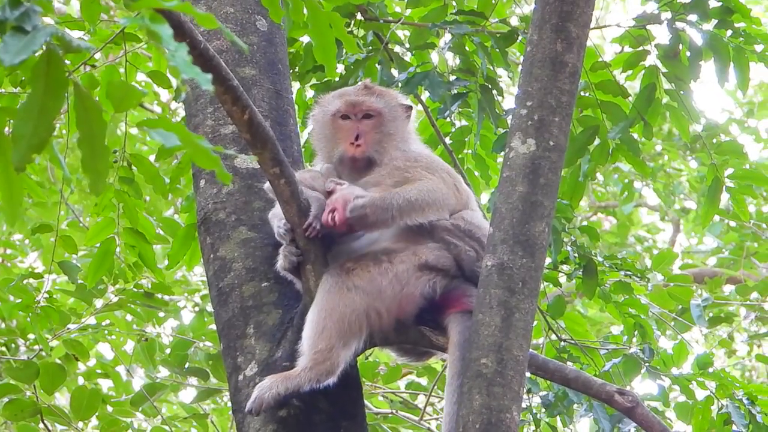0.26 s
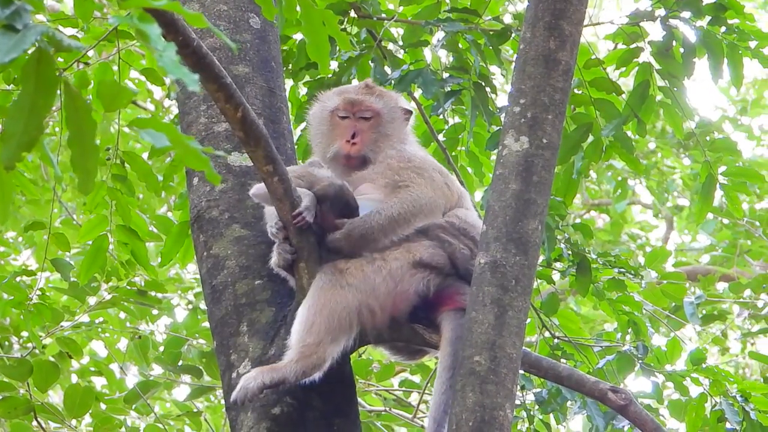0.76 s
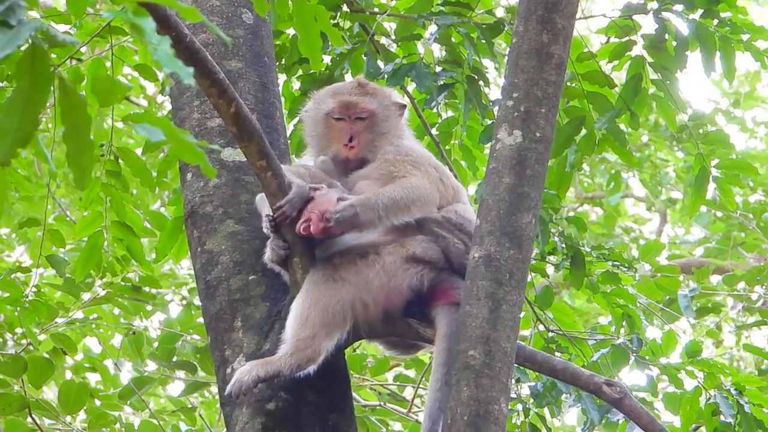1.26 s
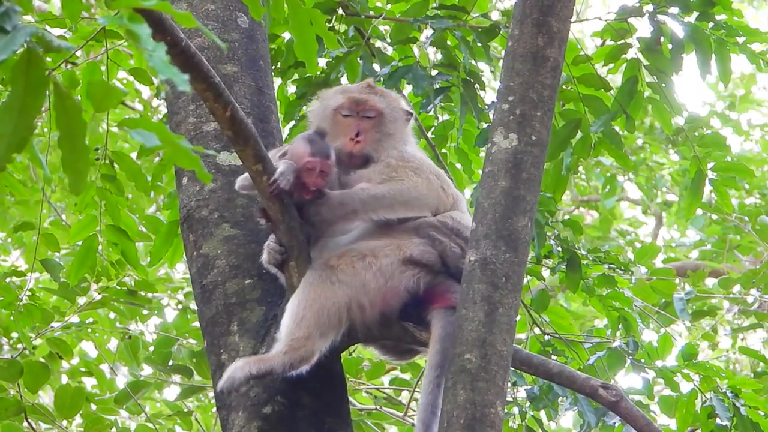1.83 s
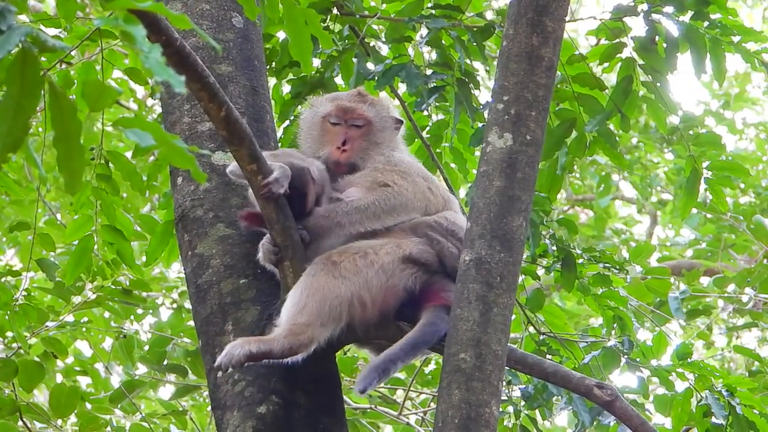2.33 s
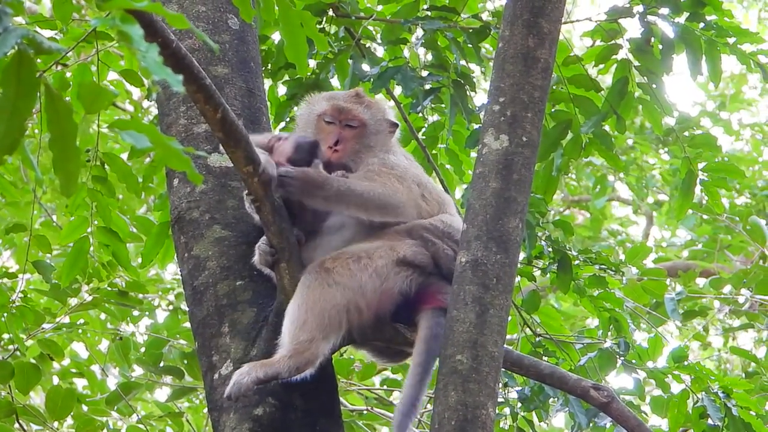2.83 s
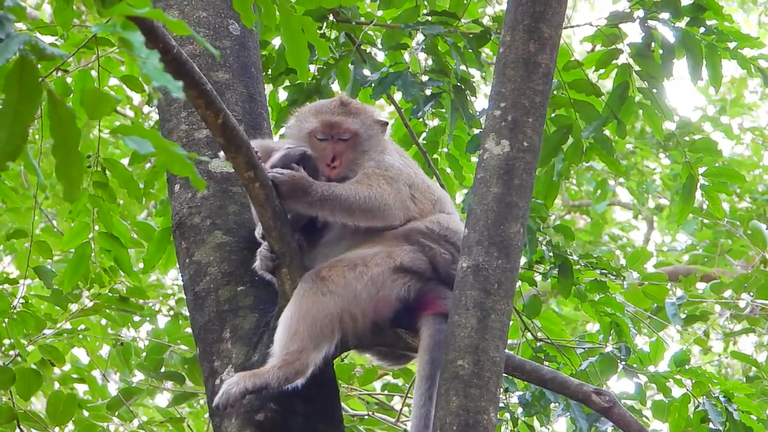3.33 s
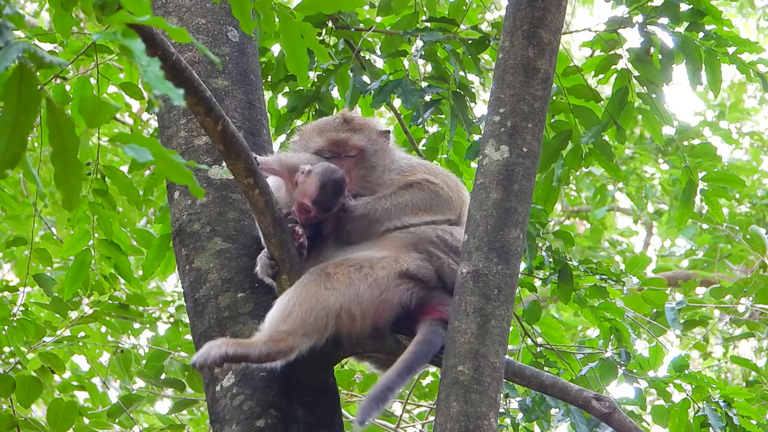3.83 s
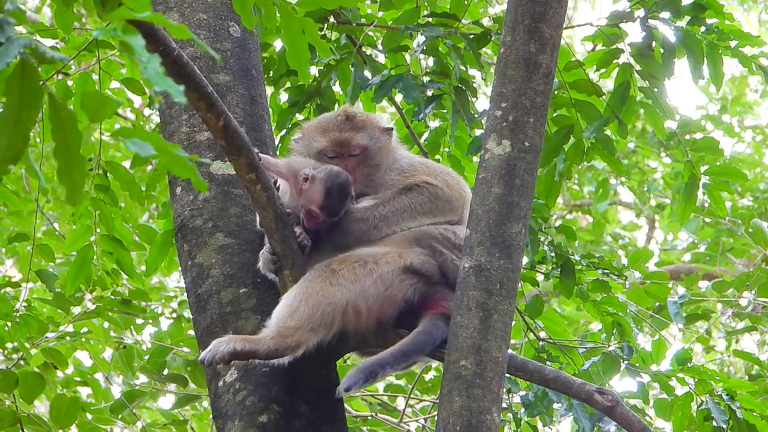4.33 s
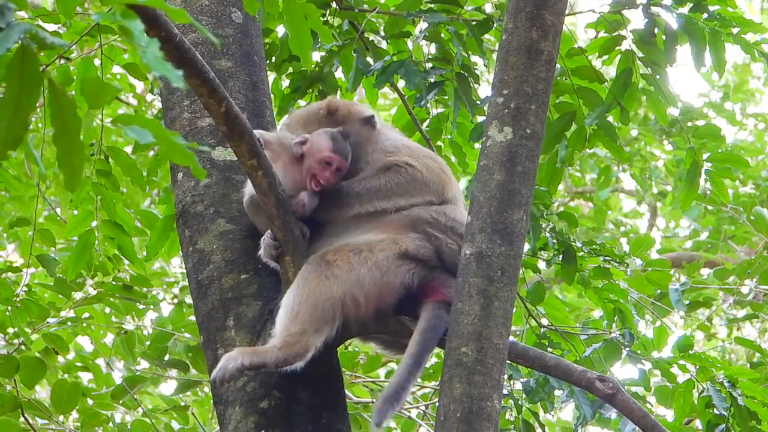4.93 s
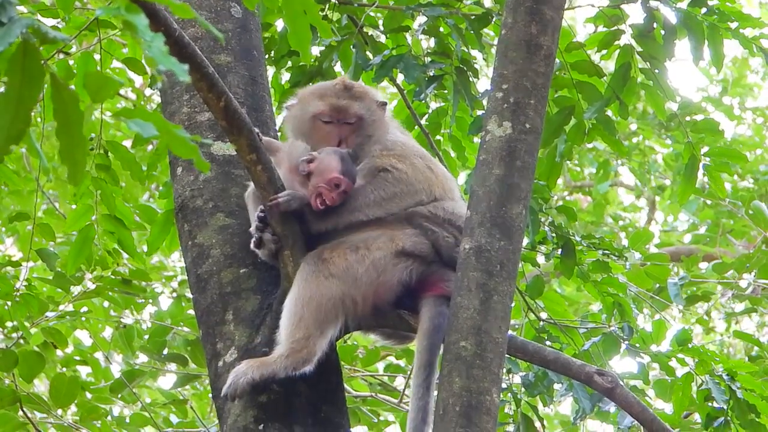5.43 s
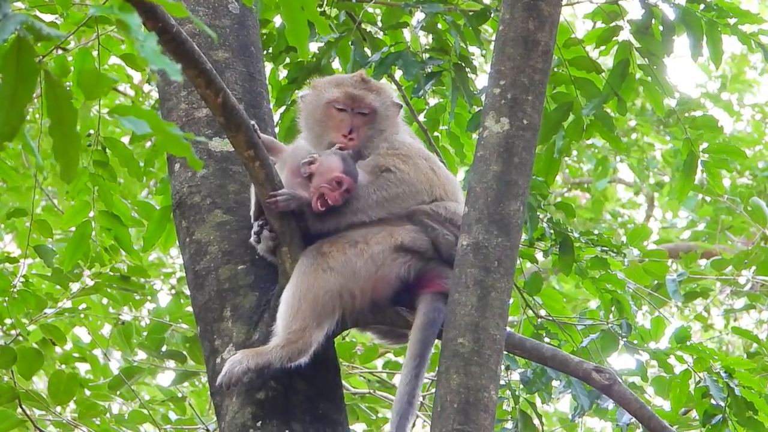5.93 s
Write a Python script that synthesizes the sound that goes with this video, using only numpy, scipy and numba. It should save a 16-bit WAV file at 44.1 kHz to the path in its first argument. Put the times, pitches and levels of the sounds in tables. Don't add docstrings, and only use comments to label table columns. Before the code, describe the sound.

Outdoors in a forest, a quiet bed of wind, leaves and faint insects runs throughout. At 0 seconds a raspy infant monkey scream is already dying away, its echo hanging in the trees. Nine more shrill cries follow, starting near 0.45, 1.1, 1.7, 2.35, 2.9, 3.7, 4.45, 5.0 and 5.6 seconds, each about a quarter to two fifths of a second long. Most open with a thin whistle sweeping upward, then break into a harsh, buzzing, high rasp that darkens or sinks as the mouth closes. The first of these has two bursts; those near 2.9 and 3.7 open with especially clear, loud peeps. A faint low hoot sounds far off around 1.1 seconds, and a dry twig knock clicks near 3.6. Leaves and trunks scatter each cry into a diffuse tail. The last cry fades at 6 seconds. The source is some metres from a small stereo microphone.

```python
import sys
import numpy as np
from scipy import signal
from scipy.fft import rfft, irfft
from scipy.io import wavfile
from scipy.ndimage import uniform_filter1d
from numba import njit

SR = 44100
rng = np.random.default_rng(int(sys.argv[2]) if len(sys.argv) > 2 else 0)


def wav_record(signal):
    frames = np.transpose(np.atleast_2d(signal))
    bounded = np.clip(frames, -1, 1)
    quanta = np.round(bounded * 32767).astype(np.int16)
    wavfile.write(sys.argv[1], SR, quanta)


def to_linear_factor(level_db):
    exponent = np.asarray(level_db, float) / 20
    return 10 ** exponent


N = 272538
LEAD = 13230
M = N + LEAD
T = (np.arange(M) - LEAD) / SR


def unit(x):
    return x / np.sqrt(np.mean(x ** 2))


@njit
def svf(x, hz, width):
    y, band, low = np.empty(len(x)), 0., 0.
    for i in range(len(x)):
        g, k = np.tan(np.pi * hz[i] / SR), width / hz[i]
        v = (band + g * (x[i] - low)) / (1 + g * (g + k))
        band, low, y[i] = 2 * v - band, low + 2 * g * v, k * v
    return y


def resonance(x, hz, width_hz):
    hz = hz + np.zeros(len(x))
    once = svf(x, hz, 1. * width_hz)
    return unit(svf(once, hz, 1. * width_hz))


def above(x, hz):
    return signal.sosfilt(signal.butter(10, hz, "high", fs=SR, output="sos"), x)


def walk(rate):
    k = int(SR / rate)
    held = np.repeat(rng.standard_normal(M // k + 1), k)
    slewed = uniform_filter1d(uniform_filter1d(held, k), k)
    return unit(slewed[:M])


def decay(t, t60):
    return np.exp(-np.log(1000) * t / t60)


def moments(start, end):
    return np.linspace(start, end, num=80)


def played(tables, fade_s):
    s, *columns = np.transpose([row for table in tables for row in table])
    gate = 0
    for table in tables:
        start, end = table[0][0], table[-1][0]
        if start < .01:
            start = -1
        gate = gate + np.interp(T, [start - fade_s, start, end, end + fade_s], [0, 1, 1, 0])
    return gate, [np.interp(T, s, column) for column in columns]


# frequency [Hz], level [dB per Hz].
MURMUR_SPECTRUM = [(35, -40), (60, -55), (107, -19.5), (171, -9.5), (485, -14), (850, -14.5), (1480, -19.5),
                   (2700, -19), (4300, -23.5), (7000, -16), (11000, -50.5), (15500, -56)]
# time [s], level [dB].
MURMUR_SWELL = [(0, -65), (.6, -62), (1.4, -62), (2.4, -60.5), (2.75, -62), (3.4, -60.5), (3.85, -59),
                (4.15, -62), (4.7, -61.5), (5.7, -61.5), (6.18, -65)]


def murmur(flicker_db=3.2, side_db=-13, alike_hz=1500):
    out = 0
    shape_hz, shape_db = np.transpose(MURMUR_SPECTRUM)
    swell_db = np.interp(T, *np.transpose(MURMUR_SWELL))
    for hz in 30 * 2 ** np.arange(0, 9, 1 / 3):
        mid, side = (resonance(rng.standard_normal(M), hz, hz / 3) for _ in range(2))
        band_db = np.interp(np.log(hz), np.log(shape_hz), shape_db) + 10 * np.log10(hz)
        apart = min(to_linear_factor(side_db) + hz / alike_hz * 0.2, 1)
        pair = mid + apart * side * np.array([[1], [-1]])
        out = out + to_linear_factor(band_db + flicker_db * walk(9)) * pair
    return unit(out) * to_linear_factor(swell_db + 4.5)


def swing(hz, spread):
    stagger = .5 * walk(1500) + .9 * np.tanh(2 * walk(70))
    return np.sqrt(2) * np.sin(2 * np.pi * np.cumsum(hz * (1 + spread * stagger)) / SR)


# time [s], level [dB].
EFFORT = [
    [(0.0, -32.5), (.054, -36.5), (.072, -53), (.09, -68)],
    [(.458, -42), (.486, -34.5), (.5, -51.5), (.578, -36), (.69, -35), (.752, -42), (.79, -73)],
    [(1.145, -32.5), (1.195, -34.5), (1.25, -33.5), (1.327, -32.5), (1.375, -56)],
    [(1.757, -32), (1.775, -43.5), (1.891, -29.5), (1.977, -34.5), (2.003, -31.5), (2.029, -48),
     (2.08, -64)],
    [(2.36, -50), (2.404, -36.5), (2.462, -36.5), (2.52, -31.5), (2.596, -42.5), (2.61, -64)],
    [(2.94, -47), (2.994, -39.5), (3.07, -37), (3.2, -30), (3.25, -49)],
    [(3.73, -41), (3.77, -42), (3.851, -31), (3.987, -33), (4.031, -34), (4.073, -36.5), (4.09, -67)],
    [(4.55, -55.5), (4.6, -29.5), (4.666, -31), (4.702, -35.5), (4.808, -39), (4.84, -66)],
    [(5.02, -45.5), (5.05, -43.5), (5.07, -39), (5.245, -31.5), (5.268, -59)],
    [(5.64, -55), (5.676, -36.5), (5.782, -29.5), (5.834, -37), (5.924, -34), (5.948, -32), (6.0, -44)],
]
# mouth resonance [Hz], second resonance [dB],
# treble [dB], throat [dB], left minus right [dB].
MOUTHS = [
    (4450, -3, -18.5, -24, 3),
    (4400, -12.5, -19.5, -20.5, 2),
    (4604, -3, -13.5, -20.5, 1.5),
    (4600, -10, -14.5, -22.5, 2),
    (4494, -10.5, -18.5, -21.5, 15),
    (4450, -8.5, -15.5, -16.5, 2.5),
    (4500, -9.5, -16, -21.5, 3.3),
    (4320, -8.5, -16, -21, 2.5),
    (4650, -10, -11, -25, 1.5),
    (4620, -5.5, -18.5, -22.5, 0.8),
]


def rasp_controls():
    full_db, closing_s = -36.5, .12
    out = []
    for curve, (hz, second_db, treble_db, throat_db, pan_db) in zip(EFFORT, MOUTHS):
        s, db = np.transpose(curve)
        t = moments(s[0], s[-1])
        db = np.interp(t, s, db)
        slack = full_db - db
        shut = np.clip(1 - (s[-1] - t) / closing_s, 0, 1)
        second = second_db + 0.17 * slack - 10.5 * shut
        treble = treble_db + 0.57 * slack - 14 * shut
        throat = throat_db + 0.1 * slack - 2 * shut
        out.append(np.c_[t, db, hz - 330 * shut, second, treble, throat, pan_db + 0 * t])
    return out


def rasp(breath=.6, patchy_db=2.5, wander=.015):
    gate, (db, mouth_hz, second_db, treble_db, throat_db, pan_db) = played(rasp_controls(), .009)
    lip_hz, lip_db, second_hz, edge_hz = 5300, -4, 6500, 3430
    air = rng.standard_normal(M)
    mouth = swing(mouth_hz, 0.078) + breath * resonance(air, mouth_hz, 900)
    lips = swing(lip_hz * (1 + wander * walk(25)), 0.088) + breath * resonance(air, lip_hz, 1200)
    second_hz = second_hz * (1 + wander * walk(17))
    second = 0.27 * swing(second_hz, 0.054) + resonance(air, second_hz, 3000)
    treble = resonance(air, 10060, 5900) + to_linear_factor(-13.5) * resonance(air, 12200, 4600)
    throat = unit(above(resonance(air, 3050, 600), 2700))
    chest = to_linear_factor(-28.5) * resonance(air, 1930, 1830)
    front = unit(to_linear_factor(patchy_db * walk(150)) * mouth - to_linear_factor(lip_db + patchy_db * walk(150)) * lips)
    back = to_linear_factor(second_db + patchy_db * walk(81)) * unit(second) - to_linear_factor(treble_db + walk(47)) * unit(treble)
    upper = above(front + back, edge_hz)
    throat = to_linear_factor(throat_db + patchy_db * walk(60)) * throat
    return gate * to_linear_factor(db) * (upper + chest + throat), pan_db


# frequency [Hz], width [Hz], lift [dB].
HOLLOWS = [(4120, 150, -2), (4680, 200, -7), (5330, 200, -3), (5960, 200, -4), (6800, 250, -4)]


def hollows(cry):
    return cry + sum(to_linear_factor(db) * svf(cry, hz + np.zeros(M), 1. * width) for hz, width, db in HOLLOWS)


def whistle(tables, jitter=0.1427, shimmer_db=9, waver_db=0.5):
    gate, (hz, db, octave_db, rough) = played(tables, .005)
    shaken_hz = hz * (1 + jitter * rough * walk(900) + 0.011 * walk(150))
    phase = 2 * np.pi * np.cumsum(shaken_hz) / SR
    octave = to_linear_factor(octave_db + 4.0 * walk(120)) * np.sin(2 * phase) * np.clip((6500 - hz) / 1000, 0, 1)
    shaken_db = db + (waver_db + shimmer_db * rough) * np.clip(walk(250), -3, 1.5)
    return np.sqrt(2) * gate * to_linear_factor(shaken_db) * (np.sin(phase) + octave)


def glides(rows, octave_db, rough):
    edges = ((0, -0.5), (0.79, 0), (1, -3))
    out = []
    for s, long, from_hz, to_hz, db in rows:
        out.append([(s + share * long, from_hz + share * (to_hz - from_hz), db + edge_db, octave_db, rough)
                    for share, edge_db in edges])
    return out


# start [s], length [s], from pitch [Hz], to pitch [Hz], peak level [dB].
ENDINGS = [(.03, 0.05, 4800, 3400, -43.5), (.63, .075, 4200, 4150, -36.5), (.718, .06, 4266, 3700, -36.5),
           (1.325, .042, 5600, 3250, -37.5), (1.678, 0.046, 1325, 1850, -56.5),
           (2.01, 0.05, 4650, 3750, -34), (2.485, .075, 4210, 4150, -34), (2.572, .03, 4190, 3600, -34),
           (2.883, .014, 3197, 3600, -62), (4.022, 0.033, 5160, 4750, -32),
           (4.062, 0.019, 4600, 3600, -30.5), (5.06, .11, 4790, 4600, -35.5),
           (5.82, .165, 2828, 2650, -54.5)]


def endings():
    return glides(ENDINGS, -42, rough=.22)


# start [s], length [s], from pitch [Hz], to pitch [Hz],
# peak level [dB].
CREAKS = [
    (.438, 0.00904, 3147, 3400, -54),
    (3.688, 0.0084, 4900, 4600, -47),
    (4.43, 0.01827, 3200, 3700, -60),
    (4.735, .075, 3563, 3000, -38),
    (5.185, 0.066, 4400, 3504, -37),
]


def creaks():
    return glides(CREAKS, -23, rough=.45)


# time [s], pitch [Hz].
OPENINGS = [
    [(.455, 3400), (.464, 3750), (.482, 4700), (.497, 6300), (.53, 8100)],
    [(1.093, 5600), (1.105, 4300), (1.116, 3900), (1.13, 3830), (1.143, 4550), (1.165, 4680), (1.24, 4760)],
    [(1.717, 2350), (1.73, 2900), (1.738, 3750), (1.752, 3950), (1.765, 5300), (1.785, 6750), (1.87, 7350)],
    [(2.342, 3030), (2.37, 3790), (2.41, 4720)],
    [(2.883, 3230), (2.905, 4060), (2.918, 4310), (2.933, 4450), (2.95, 5320), (2.97, 5720)],
    [(3.687, 3960), (3.708, 4120), (3.722, 4300), (3.73, 4700), (3.738, 5900), (3.755, 6700), (3.78, 7570),
     (3.81, 8430)],
    [(4.452, 3250), (4.464, 3820), (4.483, 4200), (4.494, 5660), (4.506, 5550), (4.512, 4720),
     (4.528, 7450), (4.55, 7430), (4.6, 8080)],
    [(5.002, 6300), (5.01, 5350), (5.02, 5320), (5.032, 5970), (5.052, 6110), (5.08, 7840), (5.11, 6770)],
    [(5.579, 5370), (5.588, 5410), (5.597, 4400), (5.607, 5180), (5.617, 4800), (5.635, 6320), (5.69, 8850),
     (5.73, 8940)],
]
# time [s], peak [dB], swell [dB/s], octave level [dB].
PEEPS = [
    (0.465, -43.5, 600, -58),
    (1.142, -30, 550, -42),
    (1.732, -34, 806, -49),
    (2.37, -43.5, 350, -83),
    (2.92, -29.5, 1293, -65),
    (3.708, -27.5, 1100, -66),
    (4.482, -40, 232, -55.5),
    (5.009, -41, 1795, -67),
    (5.61, -39.5, 60, -52),
]
TRAILS_DB = [-49, -42, -39, -46, -41, -39, -46, -44, -45]
HOARSE = [.28, .08, .08, .3, .05, .02, .15, .07, .09]


def openings():
    hold_s, fall_db_s, rough_per_s, octave_most_db = 0.012, 1500, 1.2, -2
    out = []
    for curve, (peep, peep_db, swell, octave_db), trail_db, rough in zip(OPENINGS, PEEPS, TRAILS_DB, HOARSE):
        s, hz = np.transpose(curve)
        t = moments(s[0], s[-1])
        after = np.maximum(t - peep - hold_s, 0)
        rising_db = peep_db - swell * (peep - t)
        falling_db = np.maximum(peep_db - fall_db_s * after, trail_db)
        db = np.where(t < peep, rising_db, falling_db)
        octave = np.minimum(octave_db - db, octave_most_db)
        out.append(np.c_[t, np.interp(t, s, hz), db, octave, rough + rough_per_s * after])
    return out


def leak():
    gate, (_, db, _, _) = played(openings(), .005)
    hiss = above(resonance(rng.standard_normal(M), 8000, 8600), 3430)
    return gate * to_linear_factor(np.minimum(db - 16.5, -54) + 3.3 * walk(120)) * hiss


# start
# [s], length [s], from pitch [Hz], to pitch [Hz], peak level [dB].
STRANDS = [
    (.55, .1, 5700, 7600, -42),
    (.665, 0.059, 7150, 6400, -48),
    (1.255, 0.079, 6120, 5390, -38),
    (3.825, .065, 8000, 7470, -44),
    (3.9, .11, 6710, 6930, -35),
    (4.735, 0.046, 6656, 6360, -36),
    (5.125, .11, 6895, 6720, -39),
    (5.79, 0.14, 6500, 5600, -35),
    (5.925, 0.07, 2196, 2110, -59),
]


def strands():
    return glides(STRANDS, -39, rough=.27)


def ports(x, pan_db):
    lag_s, shade_db = .000022, -9.5
    hz = np.fft.rfftfreq(M, 1 / SR)
    half = to_linear_factor(shade_db / 2 * np.clip(hz / 8000, 0, 1) ** 4) * np.exp(1j * np.pi * hz * lag_s)
    pair = irfft(rfft(x) * np.array([half, 1 / half]), M)
    return pair * to_linear_factor(np.clip([pan_db, -pan_db], -4, 4) / 2)


# frequency [Hz], t60 [s], level [dB].
TREES = [(2820, 0.85, -41), (3600, 0.75, -18), (4600, 1.4, -24), (5630, 1.1, -27), (8100, 0.48, -9.5),
         (11000, 0.74, -14), (15000, 0.37, -7)]


def trees(cry):
    leaves_t60, leaves_db = .07, -26
    t = np.arange(int(1.6 * SR)) / SR
    near = to_linear_factor(leaves_db) * decay(t, leaves_t60) / np.sqrt(leaves_t60) * np.minimum(t / 0.0026, 1)
    tail = np.zeros((2, len(t)))
    for hz, t60, db in TREES:
        shared, apart = (resonance(rng.standard_normal(len(t)), hz, .45 * hz) for _ in range(2))
        far = decay(t, t60) / np.sqrt(t60) * np.minimum(t / 0.0022, 1)
        alike = np.clip(.4 * 4000 / hz, 0, 1)
        pair = np.sqrt(1 + alike) * shared + np.sqrt(1 - alike) * apart * np.array([[1], [-1]])
        tail += pair * (to_linear_factor(db) * far + near) * np.sqrt(np.log(1000) / SR)
    return signal.fftconvolve(cry[None], tail, axes=1)[:, :M]


# start [s], peak [dB], pitch [Hz], rise [s], t60 [s].
KNOCKS_AND_HOOTS = [
    (1.085, -47, 800, .03, .2),
    (3.5755, -40, 1500, .002, .012),
    (3.575, -45, 2200, .0005, .012),
    (3.5745, -45, 950, .001, .02),
    (3.576, -49, 3100, .0005, .03),
    (3.585, -60, 1620, .004, .12),
    (1.2, -59, 790, .03, .2),
    (1.04, -60, 770, .04, .1),
    (3.586, -50, 1400, .001, .012),
    (3.26, -56, 1500, .008, .04),
]


def small_sounds():
    out = np.zeros(M)
    for s, db, hz, rise, t60 in KNOCKS_AND_HOOTS:
        t = np.clip(T - s, 0, 1)
        envelope = np.minimum(t / rise, 1) * decay(np.maximum(t - rise, 0), t60) * (t < 1)
        out += to_linear_factor(db) * envelope * np.sin(2 * np.pi * hz * t)
    return out


def in_order(tables):
    return sorted(tables, key=lambda table: table[0][0])


def scene():
    floor = murmur()
    noise, pan_db = rasp()
    low = whistle(in_order(endings() + creaks()))
    high = whistle(in_order(openings() + strands()))
    cry = hollows(noise) + low + high + leak()
    mix = ports(cry, pan_db) + trees(cry) + small_sounds() + floor
    return mix[:, LEAD:]


def top_cut(x):
    return signal.sosfilt(signal.butter(12, 15620, fs=SR, output="sos"), x)


def record(dry):
    return top_cut(dry)


dry = scene()
out = record(dry)
wav_record(out)
```